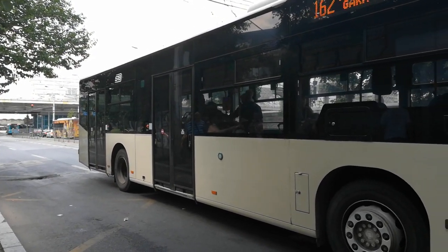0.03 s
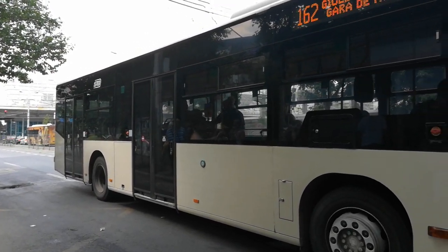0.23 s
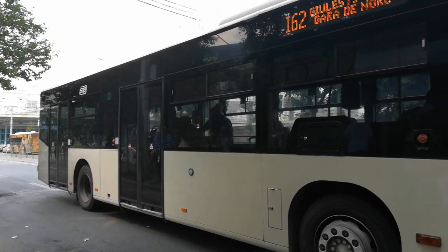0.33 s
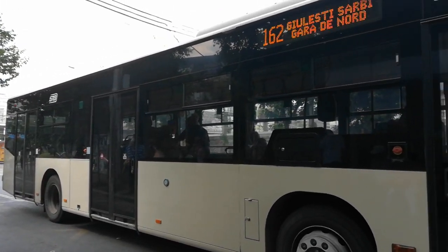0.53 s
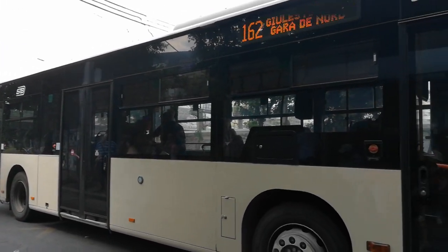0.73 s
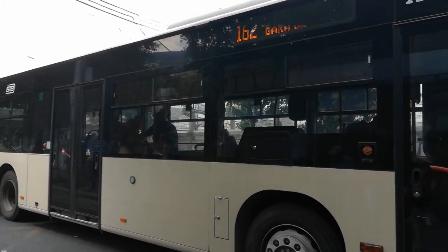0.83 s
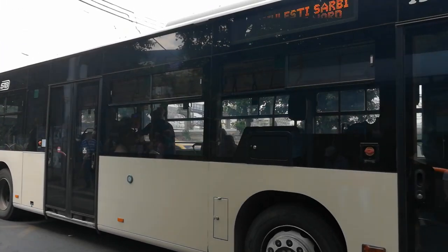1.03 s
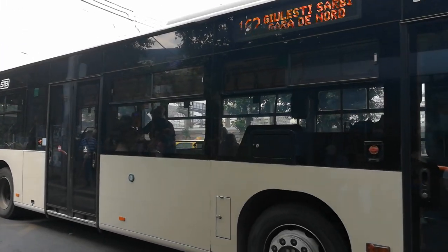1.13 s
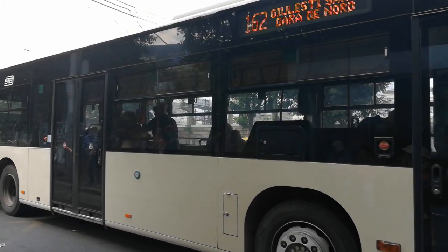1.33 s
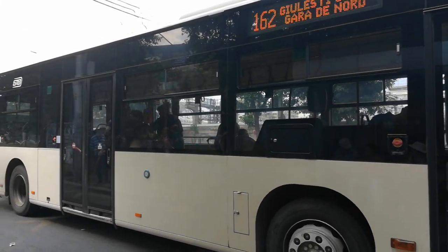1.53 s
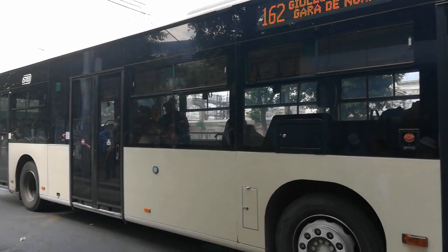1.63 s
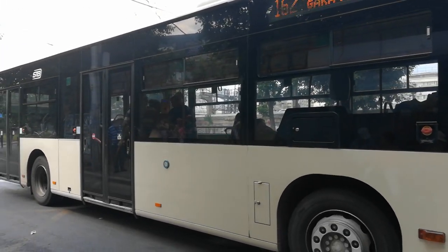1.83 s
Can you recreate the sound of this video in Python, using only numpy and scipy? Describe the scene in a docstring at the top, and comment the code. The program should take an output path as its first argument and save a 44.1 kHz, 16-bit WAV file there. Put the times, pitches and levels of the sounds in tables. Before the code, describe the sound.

A bus brake squeals on one high pitch from about 0.15 seconds, loudest around 0.4, then fluttering and fading out by 1.7. Short air hisses come at 0.1, 1.1 and 1.6 seconds. Low engine throb and street rumble run throughout, with a steady machine hum growing at 0.6 and a brief, low rising whoosh near 1.3. The sound is brighter on the left and duller on the right.

```python
"""A city bus stops

A bus creeps to a halt at the kerb over street rumble, its engine's throb and a steady machine hum.
The brake valves let out three puffs of air. A vibrating brake squeals near 5 kHz, fluttering as the
engine shakes it, and a low whoosh rises briefly near the end. The left microphone hears it all;
the right one hears it slightly later and much duller."""
import sys
import numpy as np
from scipy import signal
from scipy.fft import rfft, irfft
from scipy.io import wavfile
from scipy.ndimage import uniform_filter1d

SR = 44100
rng = np.random.default_rng(int(sys.argv[2]) if len(sys.argv) > 2 else 0)


def int16_out(signal):
    """Quantize to a 16-bit WAV file."""
    q = np.round(np.clip(np.atleast_2d(signal).T, -1, 1) * 32767)
    wavfile.write(sys.argv[1], SR, q.astype(np.int16))


N = 83790
T = np.arange(N) / SR


def amp(db):
    """Turn decibels into a number to multiply by."""
    return 10 ** (np.asarray(db) / 20)


def curve(points):
    """Join (time, value) points with straight lines, giving one value per sample."""
    return np.interp(T, *np.transpose(points))


def look_up(points, hz, column=1):
    """Read a table at any frequency, blending between its rows on a musical (log) scale."""
    table = np.array(points, float)
    return np.interp(np.log(hz + 1), np.log(table[:, 0] + 1), table[:, column])


def wander(rate_hz):
    """A smooth random wobble of typical size 1, mostly slower than rate_hz."""
    hz = np.fft.rfftfreq(2 * N, 1 / SR)
    spectrum = rfft(rng.standard_normal(2 * N))
    wobble = irfft(spectrum / (1 + (hz / rate_hz) ** 4))[:N]
    return wobble / wobble.std()


def noise(level_db, patchy_db, size):
    """Noise shaped by level_db(time, frequency), with small random louder and softer patches."""
    hop = size // 4
    t = np.arange(N // hop + 5)[:, None] * hop / SR
    hz = np.fft.rfftfreq(size, 1 / SR)
    real, imag, patches = rng.standard_normal((3, len(t), len(hz)))
    patches = uniform_filter1d(patches, size=6, axis=0)
    patches = uniform_filter1d(patches, size=5, axis=1)
    spectra = (real + 1j * imag) * amp(level_db(t, hz) + patchy_db * patches / patches.std())
    return signal.istft(spectra.T * np.sqrt(1.5 * SR / size), nperseg=size, noverlap=size - hop)[1][:N]


# How strong the street's roar is, from bass to treble: frequency_hz, level_db_per_hz
STREET_COLOUR = [(20, -67.5), (60, -59), (120, -67), (250, -66), (450, -67), (620, -70.5), (1100, -69.5),
                 (1800, -74.5), (2600, -78.5), (4500, -82), (7000, -83.5), (9000, -94), (12000, -104),
                 (15000, -106)]
# How that roar swells and sinks: time_s, gain_db
STREET_SWELL = [(0, 0), (.5, -1), (1.0, 0.5), (1.4, 2), (1.55, 0.5), (1.9, .5)]
# Extra roar on the right only, compared with the shared roar: frequency_hz, gain_db
STREET_RIGHT_EXTRA = [(60, -17), (250, -12.5), (700, 1), (1500, 5.5), (3000, 0), (12000, -4)]


def street():
    """Engine and traffic make a broad roar; the right side gets some noise of its own as well."""
    def roar(gain_db):
        rumble = noise(lambda t, hz: look_up(STREET_COLOUR, hz) + gain_db(hz), patchy_db=1.5, size=2048)
        return amp(curve(STREET_SWELL)) * rumble
    shared = roar(lambda hz: 0)
    right_only = roar(lambda hz: look_up(STREET_RIGHT_EXTRA, hz))
    return np.array([shared, shared + right_only])


def tone(hz, drift, waver_db):
    """One machine tone that wavers in loudness and in pitch (drift is a share of the pitch)."""
    turns = np.cumsum(hz * (1 + drift * wander(7.8))) / SR + rng.random()
    return np.sqrt(2) * amp(waver_db * wander(5.4)) * np.sin(2 * np.pi * turns)


# The engine's deep tones: pitch_hz, start_level_db, middle_level_db, end_level_db
ENGINE_TONES = [(29.6, -42.5, -49.5, -49), (50.5, -64.5, -56.5, -37.5), (74, -47.5, -45, -47),
                (151.4, -58, -58.5, -45)]


def engine():
    """The running engine throbs with a few deep tones, each growing or fading on its own."""
    throb = np.zeros(N)
    for hz, *levels_db in ENGINE_TONES:
        level_db = np.interp(T, np.linspace(0, T[-1], len(levels_db)), levels_db)
        throb += amp(level_db) * tone(hz, drift=0.011, waver_db=1.0)
    return throb


# The tones that make up the hum: pitch_multiple, level_db
HUM_TONES = [(1, -40.5), (2, -46), (3, -51.5), (3.51, -52), (4, -60.5), (5, -58.5)]
# How the whole hum is turned up and down: time_s, gain_db
HUM_SWELL = [(0, -9.5), (.42, -12), (.63, 0), (1.1, -1), (1.55, -2), (1.72, 2), (1.9, -3)]


def machine_hum(pitch_hz=239.8):
    """A machine, perhaps a cooling fan, hums at a nearly steady pitch."""
    hum = sum(amp(db) * tone(multiple * pitch_hz, drift=0.0032, waver_db=1.5)
              for multiple, db in HUM_TONES)
    return amp(curve(HUM_SWELL)) * hum


# The three puffs of air: start_s, rise_s, hold_s, fade_db_per_s, gain_db
AIR_PUFFS = [(.06, 0.077, 0.093, 66, 1), (1.128, 0.051, 0.042, 298, -1), (1.575, 0.046, 0.034, 287, -2.5)]
# Each puff from bass to treble: frequency_hz, first_db_per_hz, second_db_per_hz, third_db_per_hz
PUFF_COLOURS = [(1000, -73, -93, -69), (2000, -76, -71, -65), (3500, -75, -68, -68),
                (5760, -73.5, -62.5, -66.5), (6600, -77.5, -63.5, -64.5), (9140, -86.5, -68.5, -75.5),
                (11700, -103, -75, -80), (15000, -106, -77.5, -84)]
# Where the air outlets whistle: pitch_hz, width_hz, boost_db
OUTLET_WHISTLES = [(1880, 86, 5), (6180, 160, 7), (6740, 350, 2.5), (7800, 120, 4.5)]


def air_puffs():
    """Each brake valve opens, and air hisses through its outlet and dies away."""
    out = np.zeros(N)
    for column, (start_s, rise_s, hold_s, fade_db_per_s, gain_db) in enumerate(AIR_PUFFS, start=1):
        def colour_db(t, hz):
            whistles_db = sum(boost_db / (1 + (2 * (hz - pitch_hz) / width_hz) ** 2)
                              for pitch_hz, width_hz, boost_db in OUTLET_WHISTLES)
            return look_up(PUFF_COLOURS, hz, column) + whistles_db
        age_s = T - start_s
        opening = np.clip(age_s / rise_s, 0, 1)
        fade_db = fade_db_per_s * np.maximum(age_s - rise_s - hold_s, 0)
        out += opening * amp(gain_db - fade_db) * noise(colour_db, patchy_db=1.4, size=1024)
    return out


# The squeal's pitch, which climbs a little as the pad bites, then holds: time_s, pitch_hz
SQUEAL_PITCH = [(.14, 5055), (.195, 5030), (.28, 5044), (.35, 5060), (.45, 5068), (.52, 5073), (.65, 5076),
                (.72, 5087), (1.2, 5086), (1.63, 5082), (1.67, 5062)]
# The brake grabs in surges, sings on and dies away: time_s, level_db (before gain_db is added)
SQUEAL_LEVEL = [(.135, -59), (.162, -31), (.178, -20.5), (.222, -17.5), (.28, -18), (.3, -21.5),
                (.314, -33.5), (.328, -20), (.352, -15.5), (.452, -16), (.504, -25), (.538, -18.5),
                (.566, -20), (.596, -35), (.618, -22.5), (.648, -31.5), (.668, -24.5), (.712, -23.5),
                (.745, -32), (.926, -26.5), (.984, -28), (1.134, -21), (1.22, -28), (1.338, -29),
                (1.495, -39), (1.512, -50), (1.53, -39.5), (1.628, -30), (1.645, -48), (1.72, -51)]
# How much the engine shakes the squeal, more as the bus slows: time_s, depth_share
SHAKE_DEPTH = [(.6, .03), (.78, .14), (.95, .1), (1.1, .11), (1.25, .26), (1.38, .22), (1.55, .3)]
# Fainter, higher tones above the squeal: pitch_multiple, level_db, sputter_share, shake_share
SQUEAL_OVERTONES = [(2, -42, 0.51, 0.4), (3, -48.5, .55, .6)]
# These higher tones build up later than the main one: time_s, gain_db
OVERTONE_SWELL = [(.17, -22), (.21, -8), (.4, -1.5), (.62, 0.5), (.72, -4), (.85, -8.5), (.98, -4),
                  (1.14, 2), (1.35, -10), (1.5, -23.5), (1.62, -15), (1.67, -29)]


def brake_squeal(gain_db=9, rasp_db=-32.5, jitter_hz=3.2, firing_hz=29.6, firing_at_s=1.204):
    """The brake rings at one pitch with sputtering overtones; each engine firing shakes its loudness."""
    pitch_hz = curve(SQUEAL_PITCH) + jitter_hz * wander(30)
    phase = 2 * np.pi * np.cumsum(pitch_hz) / SR
    shake = np.cos(2 * np.pi * firing_hz * (T - firing_at_s))
    shake *= 1 + 0.39 * wander(12)  # the shake takes hold unevenly
    depth = curve(SHAKE_DEPTH)
    overtone_depth = np.sqrt(depth / depth.max())

    def fuzz(angle, spread_hz):
        """A narrow band of noise around a tone."""
        return (wander(spread_hz) * np.cos(angle) + wander(spread_hz) * np.sin(angle)) / np.sqrt(2)
    main_tone = (1 + depth * shake) * np.sin(phase)
    rasp = amp(rasp_db) * fuzz(phase, spread_hz=90)
    out = amp(gain_db + curve(SQUEAL_LEVEL)) * (main_tone + rasp)
    for multiple, level_db, sputter_share, shake_share in SQUEAL_OVERTONES:
        overtone = np.sin(multiple * phase) + sputter_share * fuzz(multiple * phase, spread_hz=38)
        flutter = 1 + shake_share * overtone_depth * shake
        out += amp(level_db + curve(OVERTONE_SWELL)) * flutter * overtone
    start_s, end_s = SQUEAL_LEVEL[0][0], SQUEAL_LEVEL[-1][0]
    fade_in_out = np.clip(np.minimum(T - start_s, end_s - T) / 0.01, 0, 1)
    return fade_in_out * out


def whoosh(peak_s=1.345, half_length_s=0.089, pitch_hz=380, octaves_per_s=4.6, width_octaves=0.13):
    """A narrow band of low noise swells, climbs in pitch and fades."""
    def level_db(t, hz):
        octaves_away = np.log2((hz + 1) / pitch_hz) - octaves_per_s * (t - peak_s)
        off_pitch_db = 20 * np.log10(1 + (octaves_away / width_octaves) ** 2 / 2)
        fade_db = 4 * ((t - peak_s) / half_length_s) ** 2
        return -54 - off_pitch_db - fade_db
    return noise(level_db, patchy_db=-1.3, size=2048)


def echo(sound, gain_db, decay_s=0.17):
    """Sound bounces off the road and the side of the bus, fading by 60 dB in decay_s."""
    t = T[:SR // 2]
    tail = rng.standard_normal(len(t)) * amp(-60 * t / decay_s)
    tail *= t > 0.004  # the first bounce takes 4 ms to arrive
    return amp(gain_db) * signal.fftconvolve(sound, tail / np.linalg.norm(tail))[:N]


# How much quieter things are at the right microphone: frequency_hz, loss_db
RIGHT_LOSS = [(60, 0), (200, -1.5), (380, 3), (700, 10), (1290, 20), (2380, 19.5), (5000, 21.5),
              (8100, 29.5), (15000, 21.5)]


def right_microphone(sound, delay_s=0.00058):
    """Sound reaches the shaded right microphone a little late and with much less treble."""
    hz = np.fft.rfftfreq(2 * N, 1 / SR)
    muffle = amp(-look_up(RIGHT_LOSS, hz))
    delay = np.exp(-2j * np.pi * hz * delay_s)
    return irfft(rfft(sound, 2 * N) * muffle * delay)[:N]


# The squeal swells and dips on the right as the wheel rolls past: time_s, gain_db
SQUEAL_RIGHT_SWELL = [(.22, -4), (.35, 3.5), (.48, -5), (.6, 5), (.78, -4.5), (.95, 3.5), (1.15, 0),
                      (1.4, 2), (1.62, -5)]


def scene():
    """Mix the brake sounds, their echoes and the background into a left and a right channel."""
    squeal, puffs = brake_squeal(), air_puffs()
    direct = np.array([squeal, amp(curve(SQUEAL_RIGHT_SWELL)) * squeal]) + puffs
    echoes = np.array([echo(squeal + puffs, gain_db=-23.5), echo(squeal + puffs, gain_db=-8.5)])
    left, right = direct + echoes + engine() + machine_hum() + whoosh() + street()
    return np.array([left, right_microphone(right)])


def record(dry):
    """Cut away the very highest treble, above 15.9 kHz."""
    low_pass = signal.firwin(511, 15900, window=("kaiser", 9), fs=SR)
    return signal.oaconvolve(dry, low_pass[None], "same")


dry = scene()
out = record(dry)
int16_out(out)
```